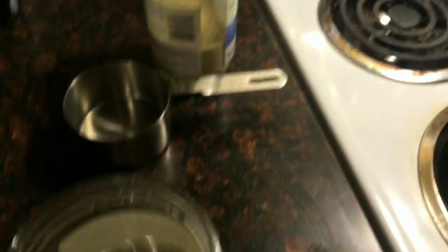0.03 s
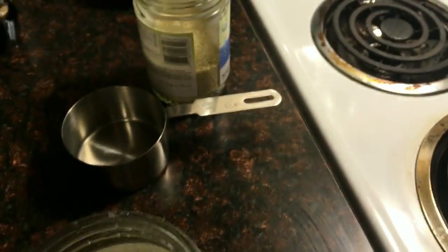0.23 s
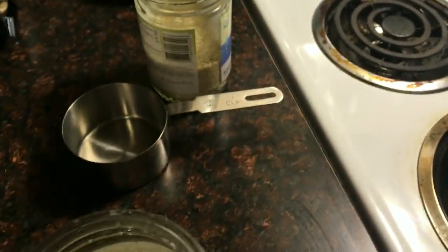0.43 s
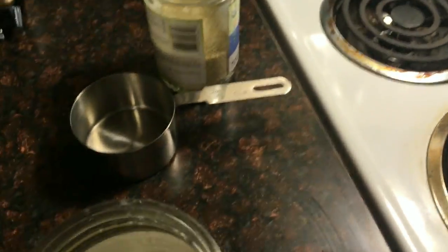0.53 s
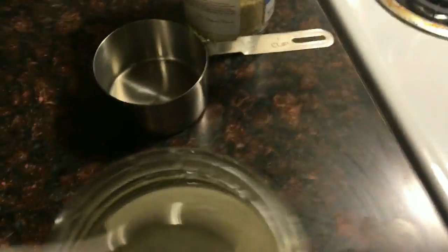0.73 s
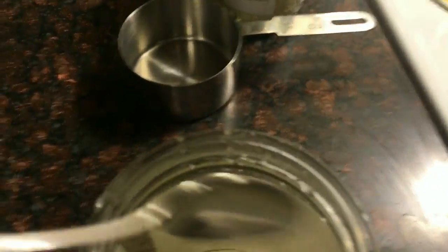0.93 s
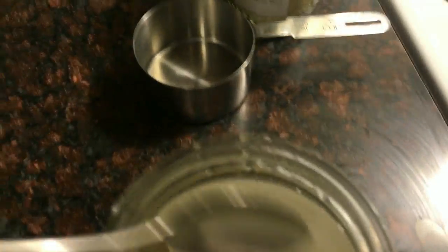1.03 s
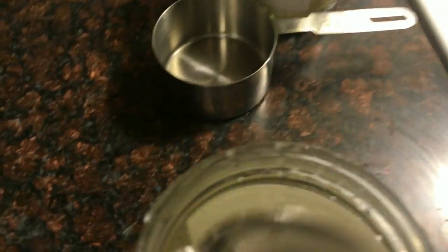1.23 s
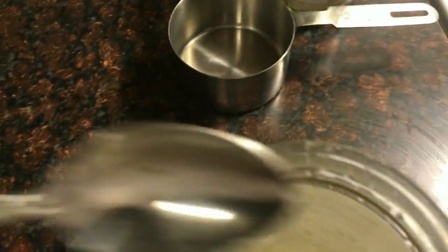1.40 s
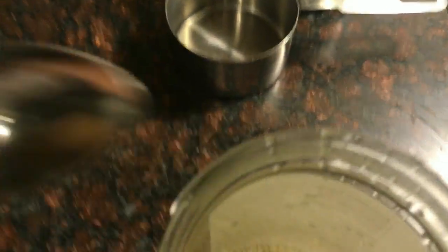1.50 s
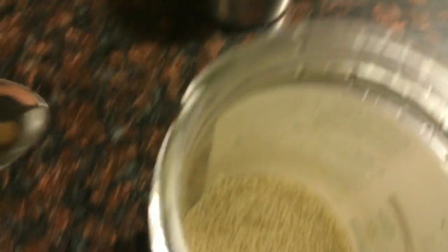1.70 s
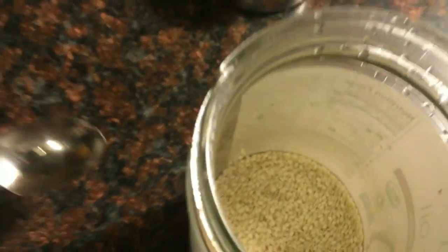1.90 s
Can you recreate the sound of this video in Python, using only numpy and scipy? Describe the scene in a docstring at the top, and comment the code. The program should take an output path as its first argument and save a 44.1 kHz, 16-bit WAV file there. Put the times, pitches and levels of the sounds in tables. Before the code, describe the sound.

A metal spoon stirs seeds and water in a glass jar, heard close. Light scrapes and softer clinks open; from 0.5 to 1.3 seconds sharp, uneven knocks ring brightly, with thin spoon ringing, jar thuds, tiny bubbles and brief squeaks. Watery slops join around 1.0 to 1.35. After the last clink at 1.3, grainy swirling fades by about 1.8, leaving low appliance hum in a small, hard kitchen.

```python
"""On a stone kitchen counter, close by, a metal spoon stirs seeds and water in a glass jar.
Short drags along the wall sing by stick-slip friction; knocks, about ten a second, excite damped modes:
the glass clinks, the spoon rings thinly and the jar thuds, each with a crack of contact.
Filtered noise makes the swirling seeds and water, which go on after the last knock, and gliding
sines the bubbles. A room tail follows the jar; an appliance hums as steady sines over still air."""
import sys
import numpy as np
from scipy import signal
from scipy.fft import rfft, irfft
from scipy.io import wavfile

SR = 44100
rng = np.random.default_rng(int(sys.argv[2]) if len(sys.argv) > 2 else 0)


def digitize_waveform(pressure):
    """Quantize a signal to 16-bit integers and store it at the path in sys.argv[1].

    Rows of a 2-D input are taken as channels; values are limited to [-1, 1].
    """
    field = np.atleast_2d(pressure).T
    bounded = np.clip(field, -1, 1)
    quanta = np.round(bounded * 32767).astype(np.int16)
    wavfile.write(sys.argv[1], SR, quanta)


N = 85995  # length [samples]
LEVEL_S = 0.025  # a blow's level is its rms if its energy were spread over this time


def amp(db):
    """Decibel law: level to amplitude gain."""
    return 10 ** (np.asarray(db) / 20)


def evened(x):
    """Power normalization: scales to an rms of one."""
    return x / np.sqrt(np.mean(x ** 2) + 1e-20)


def sized(x):
    """Energy normalization: gives a blow the energy of LEVEL_S seconds at an rms of one."""
    return x / np.sqrt(np.sum(x ** 2) / (LEVEL_S * SR) + 1e-20)


def read(points, hz):
    """Interpolation of a table on a logarithmic frequency axis."""
    table_hz, value = np.transpose(points)
    return np.interp(np.log(hz + 1), np.log(table_hz + 1), value)


def level_curve(points):
    """Amplitude envelope: a (time [s], level [dB]) table as a gain over the whole scene."""
    return amp(np.interp(np.arange(N) / SR, *np.transpose(points)))


def add(mix, s, sound):
    """Superposition: mixes a sound in at s seconds."""
    part = mix[max(round(s * SR), 0):][:len(sound)]
    part += sound[:len(part)]


def colour(x, points):
    """Linear filtering: shapes the spectrum by a (frequency [Hz], level [dB]) table."""
    hz = np.fft.rfftfreq(len(x), 1 / SR)
    return irfft(rfft(x) * amp(read(points, hz)), len(x))


def fade(x, t60s):
    """Frequency-dependent damping: each band falls 60 dB in its own t60."""
    hz, t, bands = signal.stft(x, SR, nperseg=128)
    decay = amp(-60 * t / read(t60s, hz)[:, None])
    return signal.istft(bands * decay, SR, nperseg=128)[1][:len(x)]


def ring(modes, rise_s, pitch=1):
    """Modal synthesis: one blow starts a sum of exponentially damped sines."""
    t = np.arange(SR // 2) / SR
    waves = np.zeros(len(t))
    for hz, db, t60 in modes:
        decay = np.exp(-np.log(1000) * t / t60)
        waves += amp(db) * decay * np.sin(2 * np.pi * (hz * pitch * t + rng.random()))
    return sized(waves * (1 - np.exp(-t / rise_s)))


# Where the spoon lands and how high the water stands set each part's strength and pitch:
# (time [s], low glass level [dB], middle glass level [dB], high glass level [dB], spoon level [dB],
#  crack level [dB], thud level [dB], middle pitch [ratio], high pitch [ratio]); levels before part trims
KNOCKS = [(0.0365, -53.5, -33.5, -38.5, -56, -58.5, -55, .985, 1.003),
          (0.1266, -32.5, -31, -30.5, -37, -34.5, -38.5, 1.07, 1.05),
          (0.3078, -29.5, -26.5, -21.5, -46, -32.5, -38, 1.03, .98),
          (0.4717, -50, -41.5, -40.5, -40, -40.5, -55.5, 1.0, .98),
          (.5368, -26, -18.5, -16, -36, -20, -32.5, 1.027, 1.006),
          (0.6767, -26.5, -14, -24, -40.5, -22, -33, 1.015, 0.97),
          (.7422, -32.5, -20, -12, -39, -23.5, -54.5, 1.016, 1.007),
          (.8335, -28.5, -18, -21.5, -40.5, -23.5, -31.5, 1.015, .998),
          (.9215, -41.5, -29, -19, -30, -31, -61.5, 1.045, 0.99),
          (0.9808, -34.5, -22, -24.5, -24, -18.5, -25.5, 1.025, .98),
          (1.1021, -34, -54, -36.5, -29, -30, -53, 0.88, 1),
          (1.137, -29, -16, -17, -25.5, -22.5, -26, 1.046, 0.99),
          (1.2543, -22, -27, -28, -29, -21.5, -36, 1.04, 0.96),
          (1.3145, -30, -33, -33, -32, -30.5, -34.5, 1.02, .99)]
# Low, middle and high glass notes, each a cluster of modes split by the water and the uneven wall:
# (frequency before the pitch ratio [Hz], relative level [dB], t60 [s])
GLASS = [
    [(1945.5, 1.5, 0.038), (2044.4, 4.5, 0.037), (2336, -8.5, 0.07), (2633, -14.5, .09)],
    [(4246.5, 4.5, .054), (4210, -5, 0.029), (4617, -4.5, 0.05)],
    [(6180, -0.5, 0.021), (6255, 7.5, .05)],
]
# Modes of the spoon: (frequency [Hz]), and for each (relative level [dB], t60 [s])
SPOON_HZ = [2974, 4738, 7326, 8700, 9730, 12868, 13492]
SPOON_RINGS = [(-4.5, 0.11), (4.5, 0.065), (3.5, 0.076), (-2, 0.029), (-3, .045), (4.5, .045), (6, 0.029)]
# Modes of the filled jar on the counter: (frequency [Hz], relative level [dB], t60 [s])
THUD = [(95.2, -9.5, .38), (171.7, -1, 0.25), (297, -11, 0.039), (334, -1, 0.14), (418.2, -1, 0.09),
        (580, 1, 0.074)]
GLASS_DB, SPOON_DB, CRACK_DB, THUD_DB = -3.5, 1.4, -2.5, -0.5  # part trims
RING_RISE_S, CRACK_RISE_S, THUD_RISE_S = 0.0011, 0.0005, 0.0053  # attack time constants


def knocks():
    """Impact excitation: each blow sets glass, spoon and jar ringing in their own modes, with a crack."""
    out = np.zeros(N)
    spoon = [(hz, db, t60) for hz, (db, t60) in zip(SPOON_HZ, SPOON_RINGS)]
    for s, low, middle, high, spoon_db, crack_db, thud_db, middle_pitch, high_pitch in KNOCKS:
        for note, db, pitch in zip(GLASS, (low, middle, high), (1, middle_pitch, high_pitch)):
            add(out, s, amp(GLASS_DB + db) * ring(note, RING_RISE_S, pitch))
        add(out, s, amp(CRACK_DB + crack_db) * crack())
        add(out, s, amp(SPOON_DB + spoon_db) * ring(spoon, CRACK_RISE_S))
        add(out, s, amp(THUD_DB + thud_db) * ring(THUD, THUD_RISE_S))
    return out


# Colour of the countless short contact modes: (frequency [Hz], relative density [dB per Hz])
CRACK = [(150, -8.5), (600, -13), (800, -12.5), (1100, -8.5), (1550, -15), (2000, 8.5), (2600, -2.5),
         (3600, -8), (4700, 2.5), (5500, -1.5), (6400, -3.5), (8000, -7), (10500, -5), (12200, -2),
         (13400, 4), (14500, -1), (15600, -10), (16500, -18.5)]
# Their damping: (frequency [Hz], t60 [s])
CRACK_T60 = [(200, 0.091), (1000, 0.075), (4000, .055), (8000, .042), (15000, .037)]
# Echoes between the jar walls and the counter thicken each contact: (delay [s], relative level [dB])
ECHOES = [(.0019, -16), (.0037, -14), (.0058, -15), (.0083, -12)]
CRACK_PATCH_DB, CRACK_PATCH_HZ = 3, 258.9  # standard deviation and spacing of the random spectrum


def crack():
    """High modal density: modes too many to tell apart act as decaying noise, with first echoes."""
    t = np.arange(SR // 2) / SR
    # each contact point favours its own short modes
    hz = np.arange(0, SR / 2, CRACK_PATCH_HZ)
    patches = np.column_stack([hz, CRACK_PATCH_DB * rng.standard_normal(len(hz))])
    noise = colour(colour(rng.standard_normal(len(t)), CRACK), patches)
    burst = fade(noise, CRACK_T60) * (1 - np.exp(-t / CRACK_RISE_S))
    out = burst.copy()
    for delay, db in ECHOES:
        add(out, delay, amp(db) * burst)
    return sized(out)


# The spoon drags along the wall: (start [s], length [s], level before the voice levels [dB])
DRAGS = [(0.0, 0.02, -40), (0.039, 0.016, -41.5), (0.133, .014, -34), (.158, 0.017, -35),
         (0.199, .012, -46.5), (0.319, 0.017, -31)]
# Shares of the low, middle and high glass notes under friction: (relative level [dB])
DRAG_NOTES_DB = [-1.5, -1, -3.5]
# Sliding on the wet glass, the spoon sings on one mode: (start [s], length [s], level [dB])
SINGS = [(0.559, 0.041, -39.5), (0.695, 0.042, -38.5), (1.327, 0.039, -48)]
SLIPS_PER_S, DRAG_HISS_DB, SING_HZ = 1300, -14.5, 7310  # mean slip rate; relative hiss level


def drags():
    """Stick-slip friction: rapid uneven slips drive the glass notes; now and then the spoon sings."""
    out = np.zeros(N)
    for s, length, db in DRAGS:
        count = int(length * SR) + 1
        voices = [(note_db, ring(note, RING_RISE_S, pitch=0.98)) for note, note_db in zip(GLASS, DRAG_NOTES_DB)]
        voices.append((DRAG_HISS_DB, crack()))
        for voice_db, voice in voices:
            slips = rng.standard_normal(count) * (rng.random(count) < SLIPS_PER_S / SR)
            # energy grows with the length of the drag
            strength = amp(db + voice_db) * np.sqrt(length / LEVEL_S)
            add(out, s, strength * sized(signal.fftconvolve(slips, voice)))
    for s, length, db in SINGS:
        t = np.arange(0, length, 1 / SR)
        swell = np.sin(np.pi * t / length)
        add(out, s, amp(db) * evened(swell * np.sin(2 * np.pi * SING_HZ * t)))
    return out


# Between knocks the seeds rub against the glass and keep its notes murmuring: (time [s], level [dB])
GRAZE_LEVEL = [(0, -41), (.2, -59), (.42, -62), (.5, -63), (.62, -51.5), (1.2, -58), (1.36, -45.5),
               (1.5, -62), (1.95, -88.5)]
# Single seeds caught under the spoon: (time [s], level [dB])
SEED_TICKS = [(0.163, -59), (.405, -58)]
# Colour of a seed's snap: (frequency [Hz], relative density [dB per Hz])
SEED = [(2000, -23), (6000, -10.5), (12000, -8.5), (15000, -1.5), (16500, -8.5)]
SEED_DECAY_S = 0.002  # time constant


def graze():
    """Resonance under random force: friction noise drives the glass notes; odd seeds snap."""
    t = np.arange(N) / SR
    notes = sum(amp(db) * ring(note, RING_RISE_S) for note, db in zip(GLASS, DRAG_NOTES_DB))
    murmur = irfft(rfft(rng.standard_normal(N)) * rfft(notes, N), N)
    out = evened(murmur) * level_curve(GRAZE_LEVEL)
    for s, db in SEED_TICKS:
        snap = colour(rng.standard_normal(N), SEED) * np.exp(-t / SEED_DECAY_S)
        add(out, s, amp(db) * sized(snap))
    return out


# Seeds and water swirling against the glass: (time [s], level [dB])
SWIRL_LEVEL = [(0, -40.5), (.1, -57.5), (.22, -49.5), (.48, -80), (.6, -59), (1.2, -51), (1.38, -52.5),
               (1.66, -63), (1.74, -66), (1.95, -79.5)]
# Their colour: (frequency [Hz], relative density [dB per Hz])
SWIRL = [(150, 6.5), (450, 5.5), (800, -5.5), (1500, -6.5), (2200, -13.5), (2900, -5), (3700, -7),
         (6000, -8), (9000, -17), (14000, -15), (16500, -20)]
# Water slops after some of the strokes: (start [s], length [s], level [dB])
SLOPS = [(0.14, .08, -46), (0.998, 0.027, -42), (1.149, 0.054, -37), (1.272, .09, -40.5)]
# Colour of a slop: (frequency [Hz], relative density [dB per Hz])
SLOP = [(50, -17.5), (110, 4), (200, 2), (500, -2), (750, -9.5), (1200, -11.5), (2500, -27), (8000, -57)]
# The seeds hiss on round the wall after the last knock: (start [s], length [s])
WHIRL = (1.47, .3)
# Colour of that hiss: (frequency [Hz], relative density [dB per Hz])
WHIRL_COLOUR = [(500, -29.5), (1700, -1), (2700, -14), (3400, 5), (3900, 1), (4500, -3), (8000, -14.5),
                (15000, -10)]
GRAINS_PER_S, GRAIN_SPREAD_DB, WHIRL_DB = 14000, 1.5, -64  # mean grain rate; mean random boost; level


def water():
    """Random impulse trains: seeds patter in the swirl; noise swells make the slops and a last whirl."""
    hits = rng.random(N) < GRAINS_PER_S / SR
    grains = hits * rng.standard_normal(N) * amp(GRAIN_SPREAD_DB * rng.exponential(1, N))
    out = evened(colour(grains, SWIRL)) * level_curve(SWIRL_LEVEL)
    for s, length, db in SLOPS:
        add(out, s, surge(length, db, SLOP))
    start, length = WHIRL
    add(out, start, surge(length, WHIRL_DB, WHIRL_COLOUR))
    return out


def surge(length, db, spectrum):
    """Turbulent flow as coloured noise: a rounded swell of rushing sound."""
    swell = np.sqrt(np.hanning(int(length * SR)))
    noise = colour(rng.standard_normal(N), spectrum)[:len(swell)]
    return amp(db) * evened(noise * swell)


BUBBLE_HZ, BUBBLE_SPREAD = 340, 1.8  # middle starting pitch, and the largest ratio up or down from it
BUBBLE_CYCLES, BUBBLE_GLIDE = 1.7, 0.02  # decay constant [cycles], upward glide [fraction]
WAKE_S, BUBBLE_DB = 0.035, -13  # bubbles start within this time; level relative to the thud column


def bubbles(count=5):
    """Volume resonance of air pockets: short rising bubbles in each knock's wake, following its thud level."""
    out, t = np.zeros(N), np.arange(SR // 6) / SR
    for s, *_, thud_db, _, _ in KNOCKS:
        for when, size in rng.random((count, 2)):
            cycles = BUBBLE_HZ * BUBBLE_SPREAD ** (2 * size - 1) * t
            phase = cycles * (1 + BUBBLE_GLIDE * cycles / BUBBLE_CYCLES)
            envelope = np.exp(-cycles / BUBBLE_CYCLES) * (1 - np.exp(-cycles))
            pop = np.sin(2 * np.pi * phase) * envelope
            add(out, s + when * WAKE_S, amp(BUBBLE_DB + thud_db) * sized(pop))
    return out


# Reverberation time of the room: (frequency [Hz], t60 [s])
ROOM_T60 = [(150, 0.39), (700, 0.22), (2000, 0.41), (5000, .52), (8000, 0.34), (14000, .33)]
# Reverberant level against the direct sound: (frequency [Hz], level [dB])
ROOM_DB = [(100, -20.5), (700, -7.5), (2000, -13), (4500, -20.5), (6500, -19.5), (9000, -17), (14000, -24)]
ROOM_DELAY_S = 0.008


def kitchen(x):
    """Diffuse reverberation: convolution with decaying noise gives the tail of a small hard room."""
    tail = fade(rng.standard_normal(SR), ROOM_T60)
    sent = colour(np.pad(x, (0, SR // 4)), ROOM_DB)
    out = np.zeros(N)
    add(out, ROOM_DELAY_S, signal.fftconvolve(sent, tail / np.linalg.norm(tail)))
    return out


# Steady tones of the appliance: (frequency [Hz], level [dB])
HUM = [(59.2, -52), (118.4, -53.5), (199.2, -52.5), (398.4, -65.5), (468.3, -67), (3170, -78.5)]
# Colour of the still air: (frequency [Hz], relative density [dB per Hz])
AIR = [(15, -41), (30, -25.5), (48, 1.5), (75, -3), (150, -0.5), (200, -15.5), (260, -9.5), (400, -14),
       (700, -27), (2800, -32.5), (4000, -42.5), (16000, -45.5)]
AIR_DB = -51


def background():
    """Steady tones in stationary noise: an appliance hums over the still air of the kitchen."""
    t = np.arange(N) / SR
    hum = np.zeros(N)
    for hz, db in HUM:
        # root two: the levels are rms
        hum += amp(db) * np.sqrt(2) * np.sin(2 * np.pi * (hz * t + rng.random()))
    air = amp(AIR_DB) * evened(colour(rng.standard_normal(N), AIR))
    return hum + air


def scene():
    """Superposition of direct and reverberant sound: the jar close by, the room behind it."""
    jar = knocks() + drags() + graze() + water() + bubbles()
    return (jar + kitchen(jar) + background())[None]


BASS_CUT_HZ, EDGE_HZ = 31, 16300


def record(dry):
    """Band limiting: the microphone's bass cut and an upper band edge."""
    bass_cut = signal.butter(3, BASS_CUT_HZ, "high", fs=SR, output="sos")
    thinned = signal.sosfilt(bass_cut, dry)
    band_edge = signal.firwin(255, EDGE_HZ, window=("kaiser", 9), fs=SR)
    return signal.oaconvolve(thinned, band_edge[None], "same")


dry = scene()
out = record(dry)
digitize_waveform(out)
```